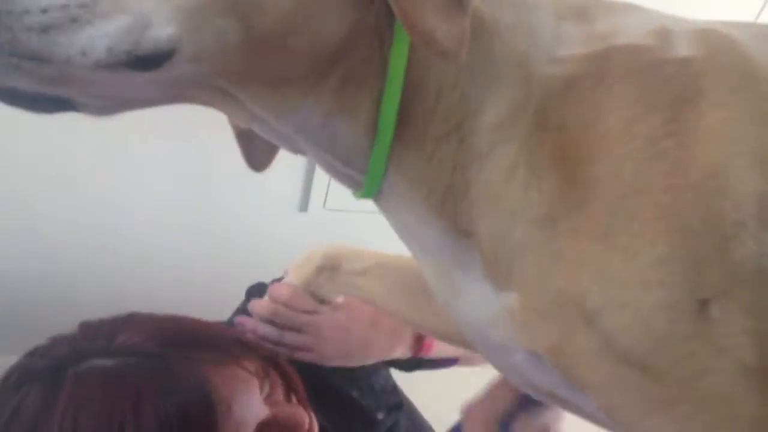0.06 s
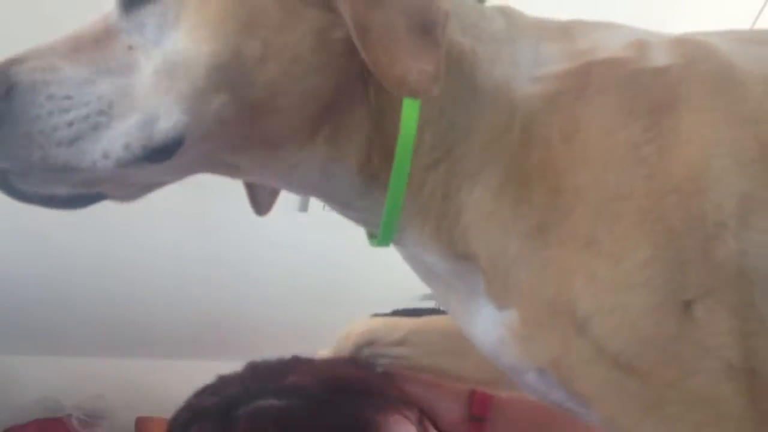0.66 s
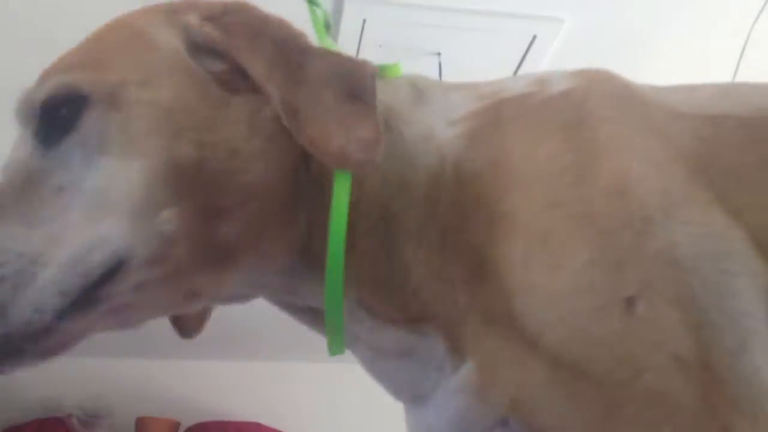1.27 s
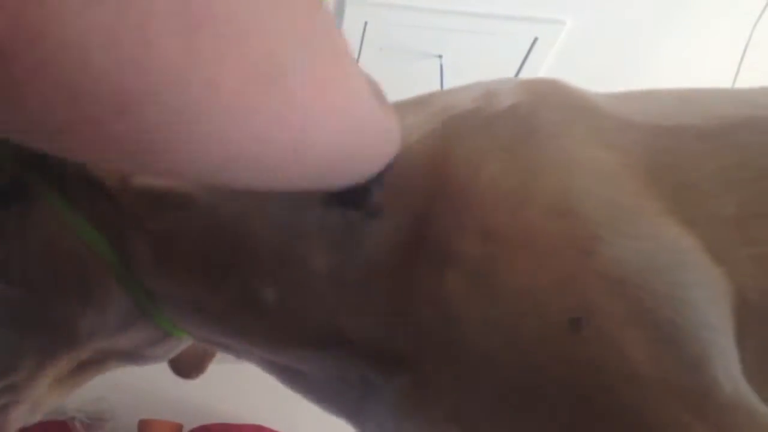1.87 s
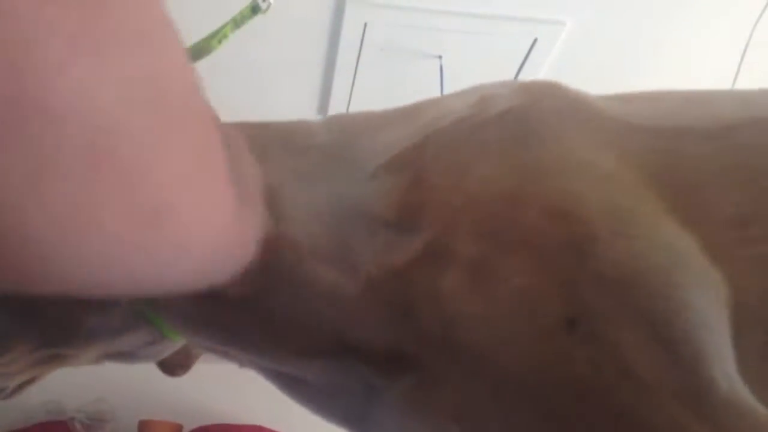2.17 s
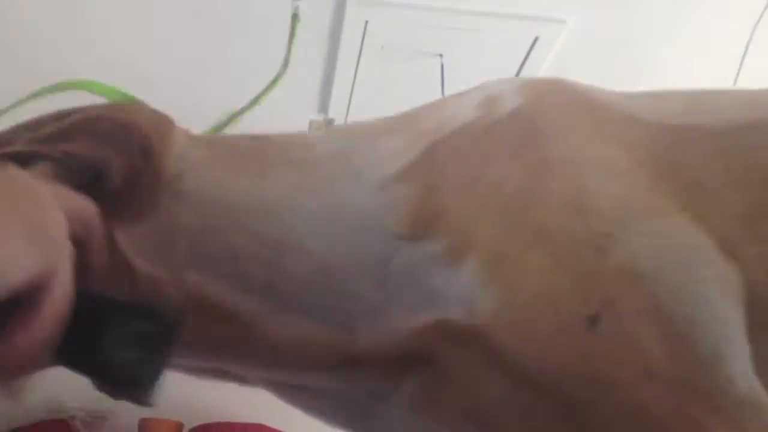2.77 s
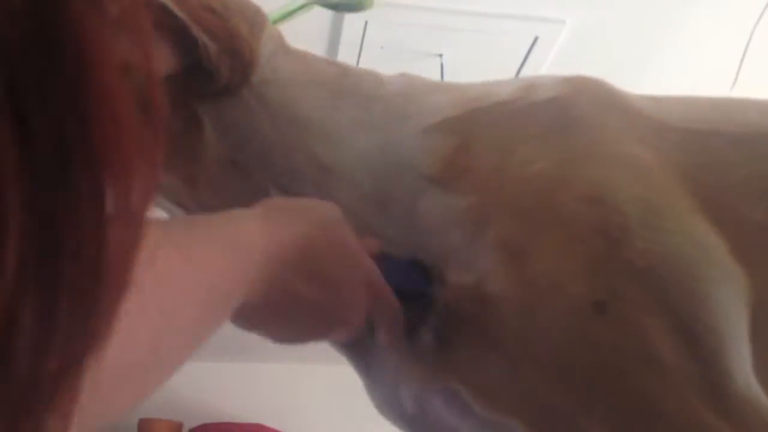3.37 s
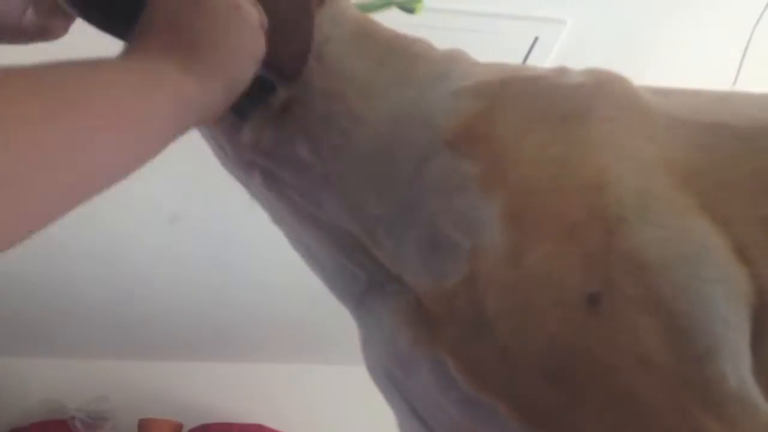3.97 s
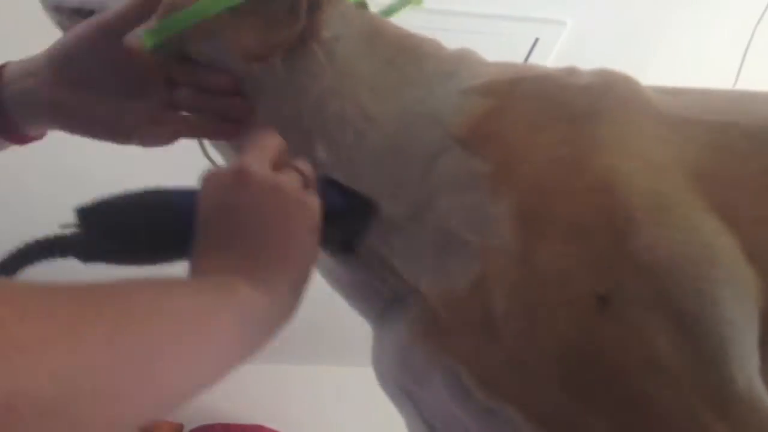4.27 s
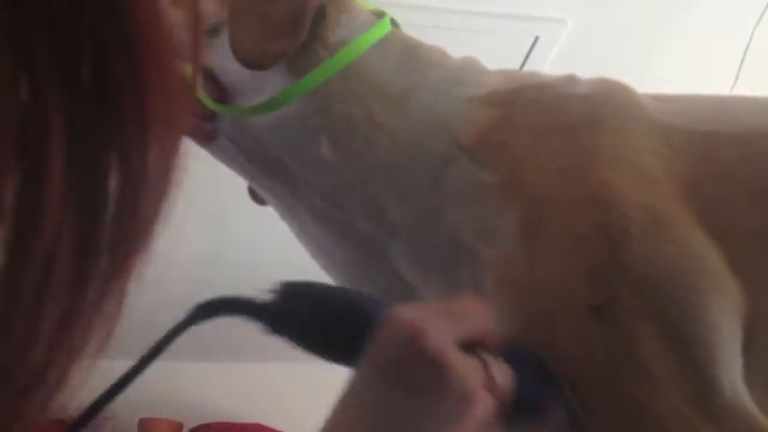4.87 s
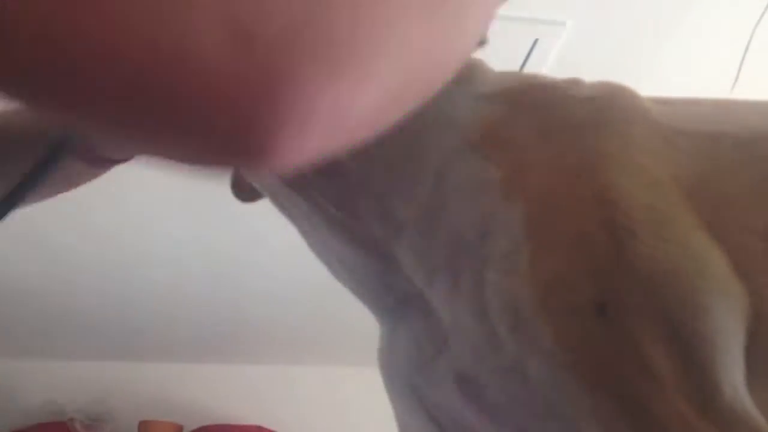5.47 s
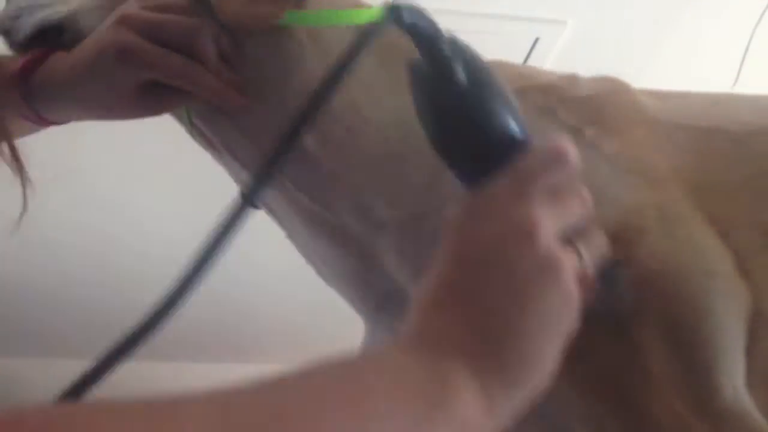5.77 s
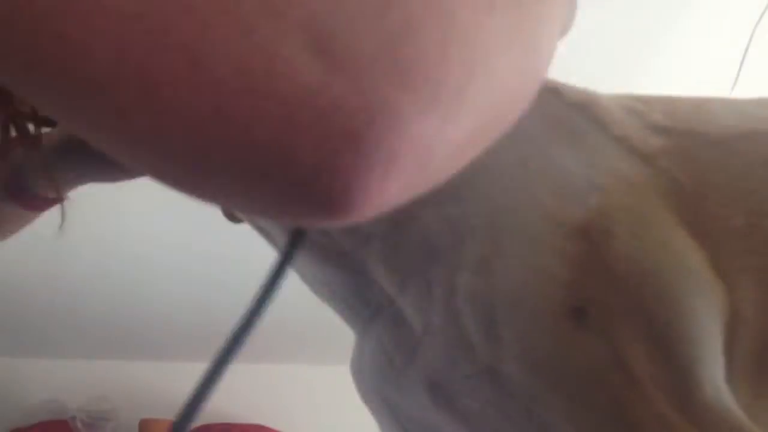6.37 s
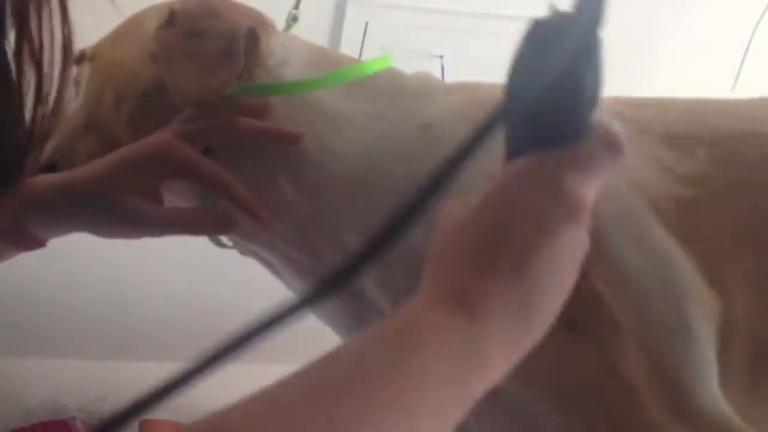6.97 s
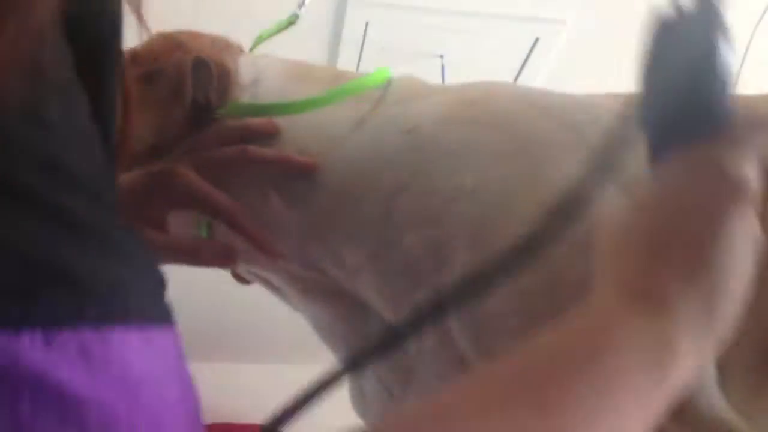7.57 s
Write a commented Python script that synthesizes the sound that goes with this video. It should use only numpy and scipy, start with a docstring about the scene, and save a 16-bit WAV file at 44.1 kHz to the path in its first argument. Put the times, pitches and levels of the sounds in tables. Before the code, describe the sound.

In a room at home, electric clippers whine and hiss without a break, heard up close with little bass. After a softer start they cut through a dog's fur in quick runs of rasping strokes, turning brighter and duller as they move. A few light clicks and a short flurry of high squeaks come before more runs of cutting. Faint room noise and a second motor's weak hum lie underneath.

```python
"""Corded clippers shave a dog's neck close to a small microphone. The blade whines on the overtones
of its stroke and hisses as steel slides on steel. Each bite into the coat slows it, damps its ring
and adds a rasp of cut hair; its colour changes as the hand turns it. Around it: short stick-slip
squeaks, light handling clicks and rubs. Behind: a second motor's hum, a faint tone and room noise."""
import sys
import numpy as np
from scipy import signal
from scipy.fft import rfft, irfft, next_fast_len
from scipy.io import wavfile
from scipy.ndimage import map_coordinates

SR = 44100
rng = np.random.default_rng(int(sys.argv[2]) if len(sys.argv) > 2 else 0)


def wrap_up_sound(samples):
    """Save the sound to the file named by the first command line argument, as 16-bit audio."""
    columns = np.atleast_2d(samples).T
    # keep every value between -1 and 1, then stretch to whole-number steps
    tamed = np.clip(columns, -1, 1)
    steps = np.round(tamed * 32767).astype(np.int16)
    wavfile.write(sys.argv[1], SR, steps)


N = 336174

# Free-running blade speed: time_s, stroke_hz
STROKE_RATE = [(0, 478), (1.15, 480), (1.55, 484), (2.3, 481.5), (3.1, 478.5), (3.7, 480.5), (5.2, 474.5),
               (5.85, 482), (6.15, 477.5), (6.45, 482), (6.7, 480), (7.1, 481.5), (7.62, 479)]
# Stroke overtones, order 4 upwards: level_db
STROKE_OVERTONES = [-60, -54, -53, -37, -55, -51, -53, -44, -45, -39, -46, -50, -48, -44, -51, -50, -48,
                    -44, -49, -40, -50, -48, -56, -49, -54, -44, -49, -42, -43, -46]
# Blade resonance near order 13, as it reaches the microphone: time_s, gain_db
RESONANCE_GAIN = [(0, -9), (1.3, -15.5), (1.5, 0), (3.7, 2.5), (4.7, 2), (6.6, 1.5), (7.62, 3)]
# Housing whine as the hand turns: time_s, gain_db
HOUSING_GAIN = [(0, -7.5), (.35, -5), (.57, 1.5), (.86, 2.5), (1.13, -9), (1.45, 4), (1.61, 5.5),
                (1.75, -6), (2.4, 4.5), (4.7, 3.5), (5.55, 1.5), (5.8, -10), (6.1, -3), (6.78, 5.5),
                (6.9, -5), (7.28, -19), (7.62, -5)]
# Middle overtones from the blade: time_s, gain_db
BLADE_GAIN = [(0, 0.5), (1.33, -2.5), (1.5, 3), (1.8, -4), (2.65, -1), (3.2, -4), (4.6, -1.5), (6.1, 1.5),
              (7.62, 3)]
# Treble from the teeth: time_s, gain_db
TEETH_GAIN = [(0, -8.5), (1.3, -8), (1.45, -0.5), (1.62, 5.5), (2, -5.5), (2.66, 4.5), (3.05, -5.5),
              (3.6, 2), (3.85, 0), (4.55, 2), (6.1, -1.5), (6.6, -4.5), (6.95, 0.5), (7.25, -4),
              (7.62, -1.5)]
# Runs of evenly spaced bites: first_s, last_s, count, half_width_s, level_db, fade_per_bite_db
BITE_RUNS = [(0.343, .978, 2, 0.033, -44, 0.5), (1.841, 2.125, 4, .042, -27, 1.5),
             (2.241, 2.568, 4, 0.038, -32.5, 0.2), (3.136, 3.138, 1, 0.0501, -35, 0),
             (3.278, 3.65, 4, .055, -29, 2.5), (3.801, 4.023, 3, .044, -28.5, 2),
             (4.752, 5.311, 2, 0.037, -41, 0.5), (5.605, 5.603, 1, 0.044, -26, -0.5),
             (5.745, 5.917, 3, .034, -29.5, 2), (6.276, 6.561, 4, 0.03, -25, 2),
             (6.86, 7.275, 5, .03, -28, 3), (7.42, 7.55, 3, 0.011, -34, 1.5)]
# Sliding steel and gears: freq_hz, density_db
STEEL_SPECTRUM = [(300, -37), (1500, -8), (2400, -14.5), (3300, 8), (4400, -13), (6100, 5.5), (7200, -2.5),
                  (8500, 3.5), (12000, -0.5), (13200, 1.5), (15500, 1.5)]
# Hair being sheared: freq_hz, density_db
HAIR_SPECTRUM = [(500, -22), (2600, -1.5), (3800, 9), (6000, 10.5), (7400, 7.5), (9300, 9), (11000, 15.5),
                 (13000, 5), (16000, 7)]
# Squeaks: start_s, length_s, first_pitch_hz, last_pitch_hz, relative_db, fade_db,
# first_resonance_hz, last_resonance_hz, roughness
SQUEAK_EVENTS = [(1.262, .018, 1700, 1580, -13.5, 6, 3300, 3100, 0.65),
                 (4.321, 0.025, 2150, 1340, -19, 2.5, 4230, 2800, 0.42),
                 (4.355, 0.027, 1960, 1910, -9.5, 17, 4200, 3540, 0.14),
                 (4.381, 0.032, 1900, 1820, -13.5, 4.5, 5100, 3100, 0.08),
                 (4.427, 0.0087, 1606, 1614, -12.5, 7, 2740, 5460, 0.12),
                 (4.438, 0.012, 1560, 1260, -15, 6, 6450, 7100, 0.42),
                 (4.456, 0.032, 1250, 1253, -26.5, 2.5, 6200, 7000, .7),
                 (4.506, 0.0074, 2050, 1860, -22.5, 1, 3900, 3880, 0.53),
                 (4.551, 0.04, 1950, 2650, -17.5, 14, 5460, 8150, .45)]
# Handling clicks: start_s, level_db, pitch_hz, length_s
HANDLING_CLICKS = [(0.031, -29.5, 687, 0.0093), (0.505, -24.5, 2230, 0.0031), (1.038, -28, 3720, 0.0035),
                   (1.042, -28, 754, 0.0072), (1.076, -29.5, 4380, 0.0047), (1.181, -31, 3900, 0.0028),
                   (1.329, -33.5, 777, .006), (1.575, -23, 738, 0.003), (1.597, -19.5, 547, 0.0039),
                   (2.784, -21, 3400, .0012), (2.785, -15.5, 707, 0.0015), (2.846, -22, 590.5, 0.0014),
                   (3.03, -15, 970, 0.0022), (3.034, -10.5, 916, 0.0016), (5.6152, -16.5, 2010, 0.0014),
                   (5.616, -15, 850, 0.0038), (6.789, -16.5, 2372, 0.0036), (6.792, -27, 648, 0.0054)]
# Rubs near the microphone: start_s, length_s, level_db
RUB_EVENTS = [(0.238, 0.23, -43.5), (1.571, 0.049, -33), (2.738, 0.12, -30)]
# Second motor's tones: pitch_hz, relative_db
MOTOR_TONES = [(422.7, -63.5), (845.3, -55.5), (939.3, -64.5), (958, -61), (1784.6, -60.5), (1878.5, -49),
               (2301.3, -62.5), (2817.8, -52.5), (3240.5, -52.5), (3287.4, -52), (4226.7, -56.5),
               (5166, -57), (5964.5, -52.5), (8922.5, -49.5)]
# Faint wandering tone: time_s, pitch_hz, rms_db
FAINT_TONE_PATH = [(2.8, 550, -80), (3.3, 543, -68), (4.8, 525, -79), (5.5, 512, -63), (6.3, 520, -60.5),
                   (6.9, 535, -62.5), (7.5, 530, -54), (7.62, 512, -54)]
# Room noise: freq_hz, density_db
ROOM_SPECTRUM = [(25, -28), (80, -23), (170, -21.5), (270, -16.5), (380, -11), (480, -0.5), (650, -2),
                 (900, -1), (1200, -5), (1600, -5), (2000, -1.5), (3000, 0), (6000, -5.5), (16000, -20)]

FULL_BITE_DB, FULL_BITE_SAG_HZ = -28, 14
HOUSING_DAMPING_DB, BLADE_DAMPING_DB, TEETH_DAMPING_DB = 7.5, 4, 7.5  # at maximum load
SQUEAK_ATTACK_S, SQUEAK_RELEASE_S, SQUEAK_CUTOFF_HZ = 0.0024, 0.0044, 1080
BAND_LIMIT_HZ = 15750


def clippers():
    """One blade stroke drives whine, steel hiss and hair rasp."""
    cutting, sag_hz = bites()
    strokes = blade_strokes(sag_hz)
    housing_db, blade_db, teeth_db = curves(HOUSING_GAIN) + curves(BLADE_GAIN) + curves(TEETH_GAIN)
    teeth_db += 2.44 * wobble(34)  # fur covers and bares the teeth
    load = np.tanh(cutting / amp(FULL_BITE_DB))  # hair damps the ring
    tone = whine(strokes, housing_db - HOUSING_DAMPING_DB * load,
                 blade_db - BLADE_DAMPING_DB * load, teeth_db - TEETH_DAMPING_DB * load)
    return tone + sliding_steel(strokes, blade_db, teeth_db) + shearing(strokes, cutting)


def bites(skew=0.25, drag_scatter=0.1201):
    """Hair drags on the blade, less with each bite of a run. Returns cutting gain and speed loss."""
    t = np.arange(N) / SR
    cutting, sag_hz = np.zeros((2, N))
    for first_s, last_s, count, half_width_s, first_db, fade_db in BITE_RUNS:
        for k, centre_s in enumerate(np.linspace(first_s, last_s, round(count))):
            db = first_db - k * fade_db
            near = np.abs(t - centre_s) < 3 * half_width_s
            offset_s = t[near] - centre_s
            side_s = half_width_s * (1 - skew * np.sign(offset_s))  # slow build, quick release
            bite = np.exp(-2 * np.abs(offset_s / side_s) ** 3)
            tuft_drag = np.exp(drag_scatter * rng.standard_normal())
            cutting[near] += amp(db) * bite
            sag_hz[near] += FULL_BITE_SAG_HZ * tuft_drag * np.sqrt(amp(db - FULL_BITE_DB)) * bite
    return cutting, sag_hz


def blade_strokes(sag_hz, waver_hz=0.9, play_cycles=0.0034):
    """Running stroke count; the motor wavers and the drive has play."""
    free_hz, = curves(STROKE_RATE)
    stroke_hz = free_hz - sag_hz + waver_hz * wobble(45)
    return np.cumsum(stroke_hz) / SR + play_cycles * wobble(260)


def whine(strokes, housing_db, blade_db, teeth_db, gain_db=1.45, drift_db=2, flutter_db=2.5):
    """Stroke overtones radiate from housing and blade, the highest from the teeth."""
    resonance_db, = curves(RESONANCE_GAIN)
    out = np.zeros(N)
    for order, db in enumerate(STROKE_OVERTONES, 4):
        reflection_db = drift_db * wobble(7) + flutter_db * wobble(90)  # off dog and arm
        if order == 7:  # steadied by the housing resonance
            path_db = housing_db + reflection_db / 2
        else:
            teeth_share = np.clip((order - 17) / 5, 0, 1)
            path_db = reflection_db + blade_db + teeth_share * (teeth_db - blade_db)
        if order == 11:  # from both housing and blade
            path_db += 0.47 * (housing_db - blade_db)
        path_db += resonance_db / (1 + (order - 13) ** 2)
        out += amp(gain_db + db + path_db) * np.sin(2 * np.pi * (order * strokes + rng.random()))
    return out


def sliding_steel(strokes, blade_db, teeth_db, gain_db=-37.5, pulse_db=1.5, split_hz=12700):
    """Steel-on-steel hiss peaks once a stroke; its top band comes from the teeth."""
    pulse = amp(pulse_db * np.cos(2 * np.pi * strokes))
    hiss = coloured(pulse * stroke_noise(strokes, memory=0.4), STEEL_SPECTRUM)
    top = highpass(hiss, split_hz, order=8)
    return amp(gain_db) * (amp(0.93 * blade_db) * (hiss - top) + amp(1.8 * teeth_db) * top)


def shearing(strokes, cutting, snap_db=6, scatter_db=1.74):
    """During a bite each stroke snips a tuft of random size."""
    snips = amp(snap_db * np.cos(2 * np.pi * strokes) + scatter_db * wobble(450))
    return cutting * coloured(snips * stroke_noise(strokes, memory=0.85), HAIR_SPECTRUM)


def stroke_noise(strokes, memory, points=96):
    """Friction noise; each stroke partly repeats the last, giving it the blade's pitch."""
    fresh = rng.standard_normal((int(strokes[-1]) + 2, points))
    repeating = signal.lfilter([1], [1, -memory], fresh, axis=0)
    return map_coordinates(repeating.ravel(), [strokes * points])


def squeaks(half_width_hz=1400, scrape_cycles=0.14, wander=0.101, shake_db=1.6, gain_db=2.5):
    """Stick-slip tones through a moving resonance; uneven slips bend and roughen them."""
    out = np.zeros(N)
    orders = np.arange(1, 9)[:, None]
    t = np.arange(SR // 10) / SR
    for start_s, length_s, hz0, hz1, db, fade_db, res0_hz, res1_hz, rough in SQUEAK_EVENTS:
        progress = np.minimum(t / length_s, 1)
        pitch_hz = (hz0 + progress * (hz1 - hz0)) * (1 + wander * rough * wobble(250, len(t)))
        resonance_hz = res0_hz + progress * (res1_hz - res0_hz)
        attack = np.minimum(t / SQUEAK_ATTACK_S, 1)
        release = np.exp(-np.maximum(t - length_s, 0) / SQUEAK_RELEASE_S)
        envelope = attack * amp(shake_db * wobble(300, len(t)) - fade_db * progress) * release
        cycles = np.cumsum(pitch_hz) / SR + scrape_cycles * rough * wobble(1800, len(t))
        weights = 1 / (1 + ((orders * pitch_hz - resonance_hz) / half_width_hz) ** 2)
        partials = weights * np.sin(2 * np.pi * (orders * cycles + rng.random(orders.shape)))
        tone = partials.sum(0) / np.linalg.norm(weights, axis=0)
        out[round(start_s * SR):][:len(t)] += amp(db + gain_db) * envelope * tone
    return highpass(out, SQUEAK_CUTOFF_HZ, order=4)  # the squeaks carry little bass


def clicks(rows, fall, grit):
    """Each click rings for a few cycles while its pitch drops."""
    out = np.zeros(N + SR)
    t = np.arange(SR // 20) / SR
    for start_s, db, hz, length_s in rows:
        age = t / (length_s / 2)
        envelope = age * np.exp((1 - age ** 2) / 2)
        cycles = np.cumsum(hz * (0.868 + fall * np.exp(-age))) / SR
        ring = np.sin(2 * np.pi * cycles) + grit * wobble(4 * hz, len(t))
        out[round(start_s * SR):][:len(t)] += amp(db) * envelope * ring
    return out[:N]


def rubs(rate_hz=140, pitch_hz=660, slip_s=0.0027, scatter_db=3):
    """A rub is a quick, uneven string of slips, each a small click."""
    slips = []
    for start_s, length_s, db in RUB_EVENTS:
        grid_s = np.arange(start_s, start_s + length_s, 1 / rate_hz)
        for time_s, (late, loud, high) in zip(grid_s, rng.standard_normal((64, 3))):
            onset_s = time_s + 0.295 * late / rate_hz
            slips.append((onset_s, db + scatter_db * loud, pitch_hz * np.exp(0.15 * high), slip_s))
    return clicks(slips, fall=0.57, grit=0.37)


def second_motor(gain_db=3.5, drift_db=2.0, jitter_samples=0.29):
    """A distant constant-speed motor; its tones swell as people move about."""
    t = (np.arange(N) + jitter_samples * wobble(2.95)) / SR
    out = np.zeros(N)
    for hz, db in MOTOR_TONES:
        out += amp(gain_db + db + drift_db * wobble(4)) * np.sin(2 * np.pi * (hz * t + rng.random()))
    return out


def faint_tone(waver_db=3.9):
    """A thin tone drifts in pitch and level."""
    hz, rms_db = curves(FAINT_TONE_PATH)
    peak = np.sqrt(2) * amp(rms_db + waver_db * wobble(3.8))
    return peak * np.sin(2 * np.pi * np.cumsum(hz) / SR)


def room_noise(rms_db=-44):
    """Steady broadband background."""
    return amp(rms_db) * coloured(rng.standard_normal(N), ROOM_SPECTRUM)


def mic_bass_cut(x, leak_db, cutoff_hz=350):
    """The small microphone passes little bass."""
    sos = signal.butter(5, cutoff_hz, "high", fs=SR, output="sos")
    return signal.sosfilt(sos, x) + amp(leak_db) * x


def amp(db):
    """Decibels to gain."""
    return 10 ** (np.asarray(db) / 20)


def curves(rows):
    """Per-sample curve for each column after time_s."""
    time_s, *columns = np.transpose(rows)
    return [np.interp(np.arange(N) / SR, time_s, column) for column in columns]


def wobble(rate_hz, size=N):
    """Smooth random curve through rate_hz knots a second."""
    knots = rng.standard_normal(int(size * rate_hz / SR) + 4)
    fine = signal.resample(knots, len(knots) * 10)
    return np.interp(np.arange(size) * rate_hz / SR * 10, np.arange(len(fine)), fine)


def filtered(x, response):
    """Apply the gain response(hz) by FFT."""
    size = next_fast_len(N + SR // 4)
    return irfft(rfft(x, size) * response(np.fft.rfftfreq(size, 1 / SR)), size)[..., :N]


def highpass(x, cutoff_hz, order):
    """Zero-phase high-pass, half gain at cutoff_hz."""
    return filtered(x, lambda hz: 1 - 1 / (1 + (hz / cutoff_hz) ** order))


def coloured(x, spectrum):
    """Shape x by (freq_hz, density_db) points; rms 1."""
    freq_hz, db = np.transpose(spectrum)
    shaped = filtered(x, lambda hz: amp(np.interp(np.log(hz + 1), np.log(freq_hz), db)))
    return shaped / np.sqrt(np.mean(shaped ** 2) + 1e-20)


def scene():
    """All sources at one microphone, alike in both channels."""
    mono = clippers() + room_noise() + second_motor() + faint_tone() + squeaks()
    mono += mic_bass_cut(clicks(HANDLING_CLICKS, fall=0.49, grit=0.36), leak_db=-25)
    mono += mic_bass_cut(rubs(), leak_db=-17)
    return np.array([mono, mono])


def record(dry):
    """Brick-wall low-pass at the recorder's band limit."""
    return filtered(dry, lambda hz: hz < BAND_LIMIT_HZ)


dry = scene()
out = record(dry)
wrap_up_sound(out)
```